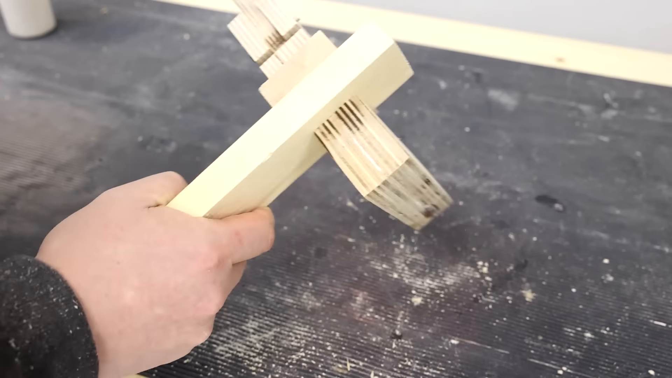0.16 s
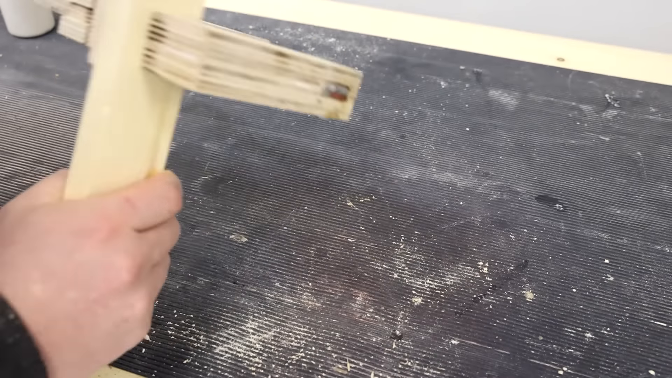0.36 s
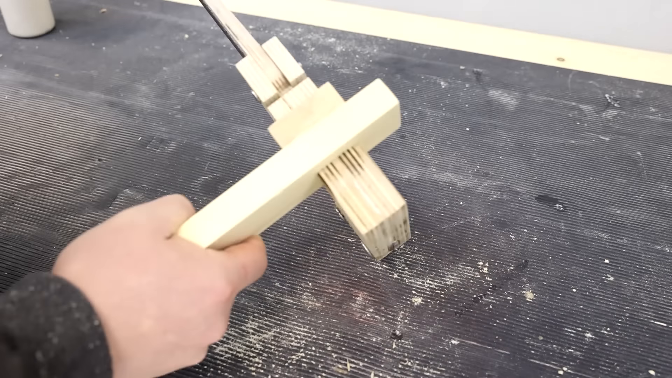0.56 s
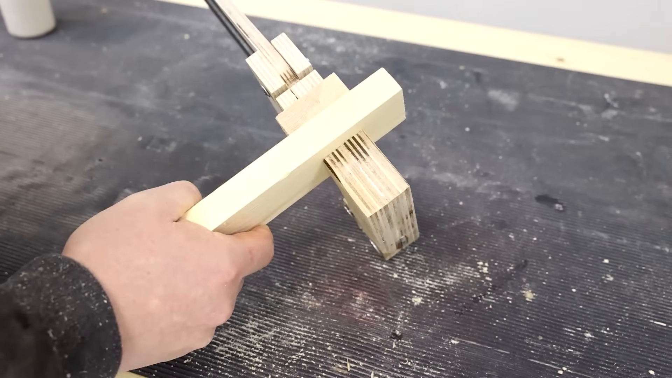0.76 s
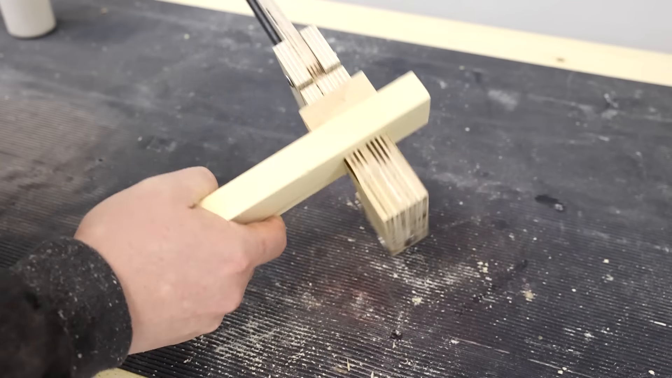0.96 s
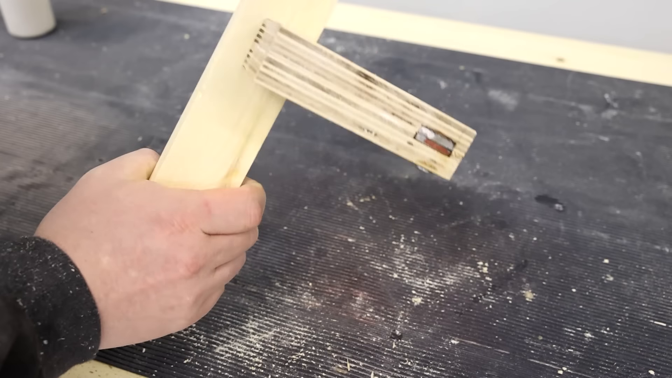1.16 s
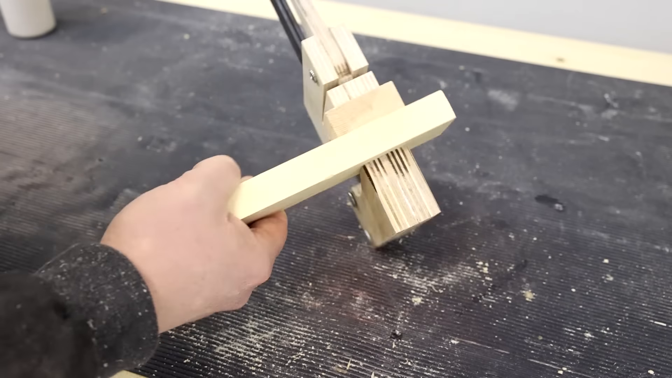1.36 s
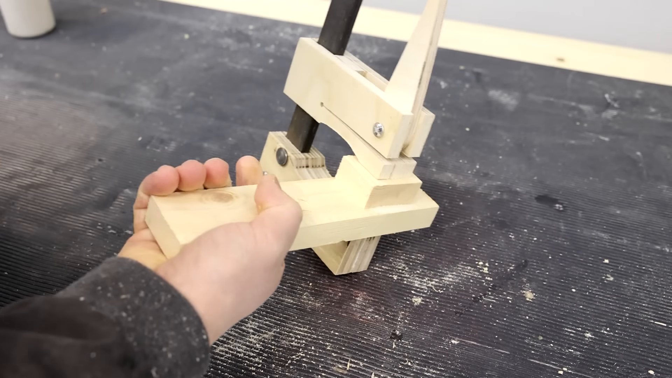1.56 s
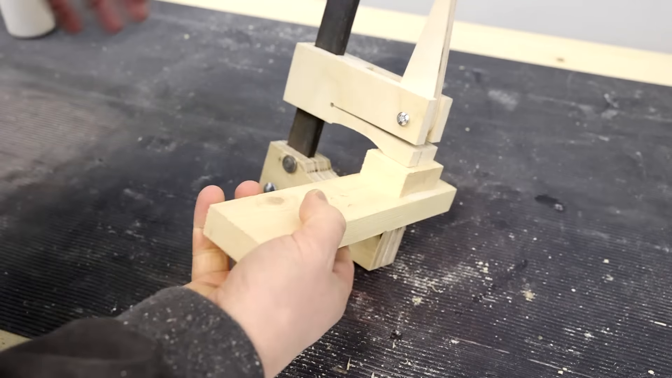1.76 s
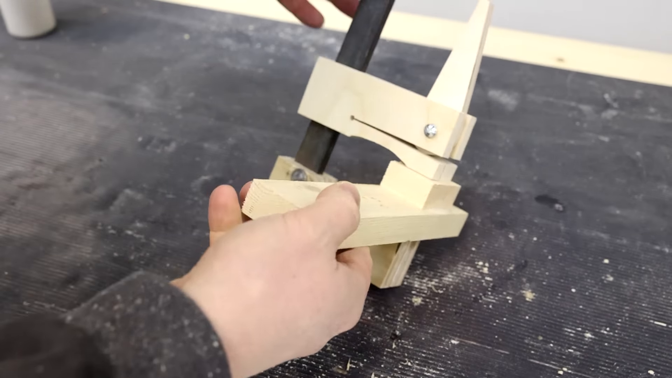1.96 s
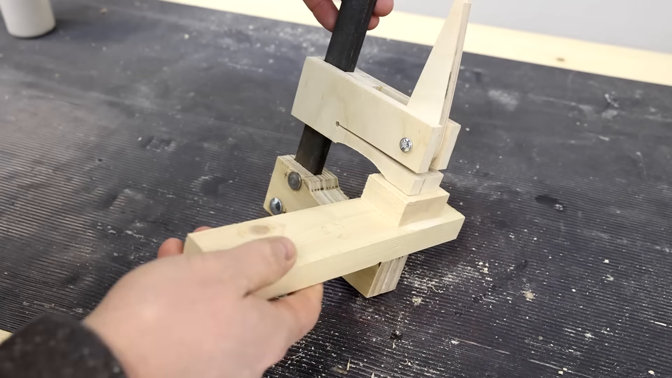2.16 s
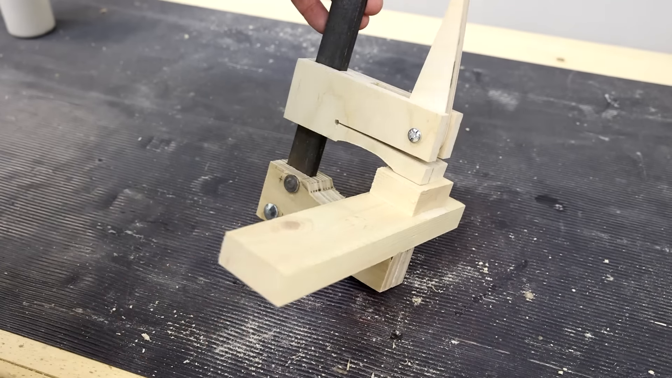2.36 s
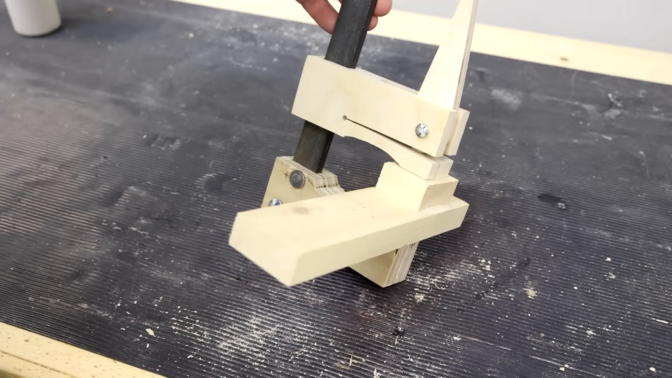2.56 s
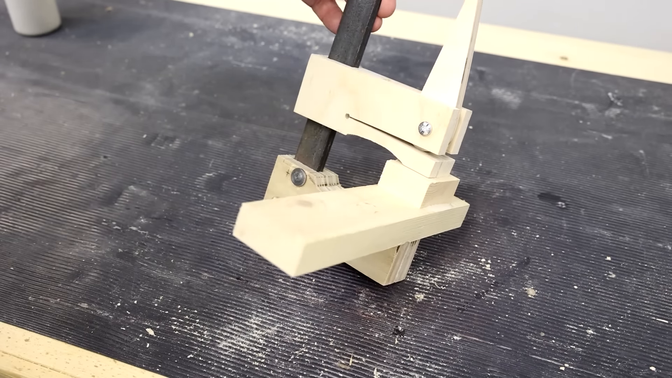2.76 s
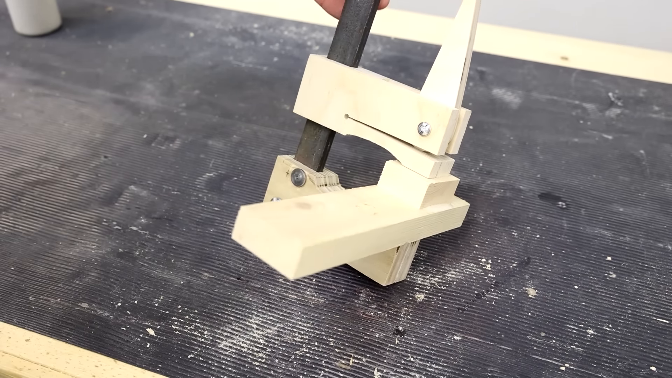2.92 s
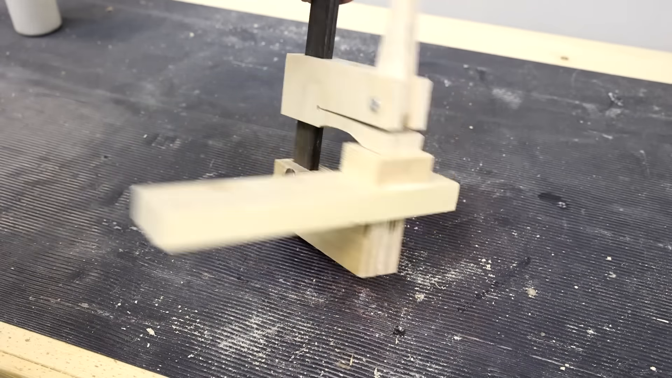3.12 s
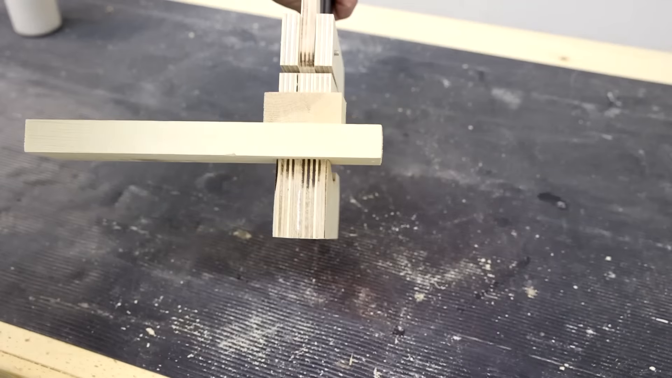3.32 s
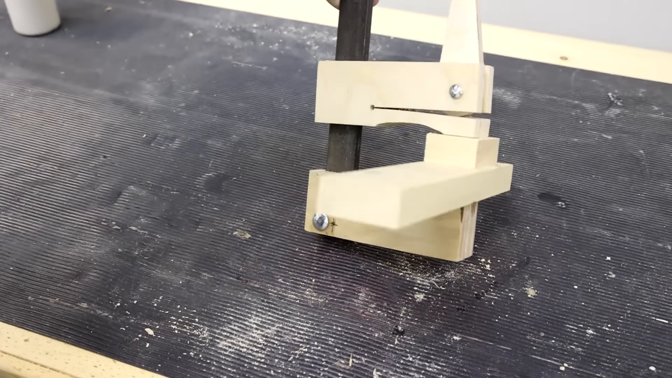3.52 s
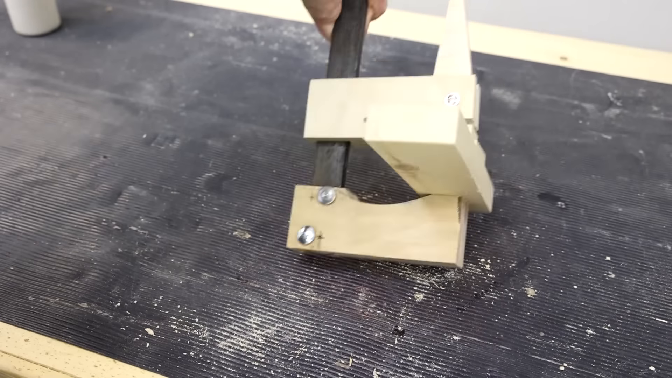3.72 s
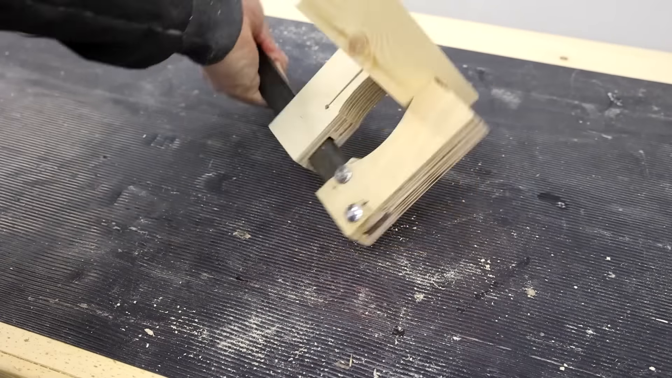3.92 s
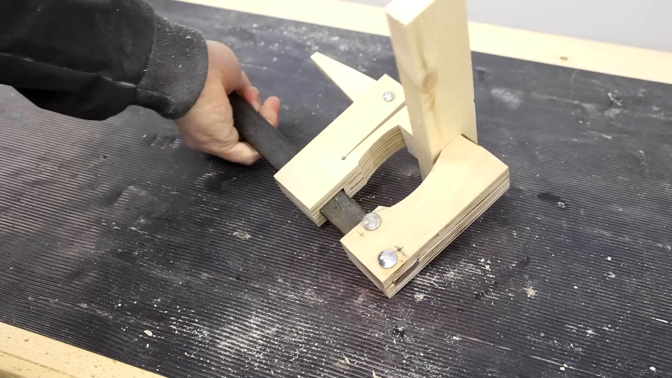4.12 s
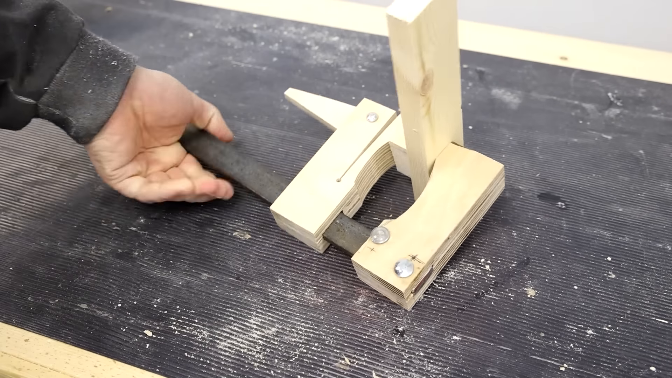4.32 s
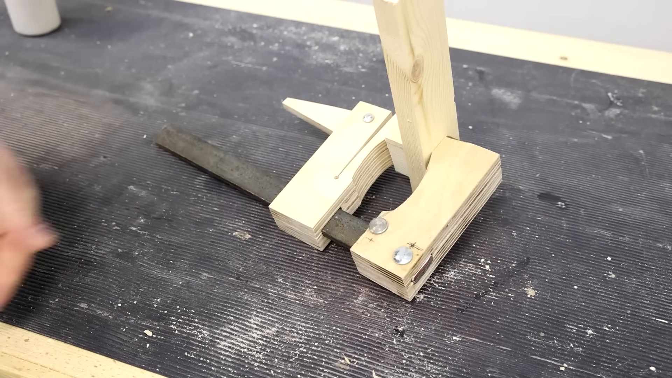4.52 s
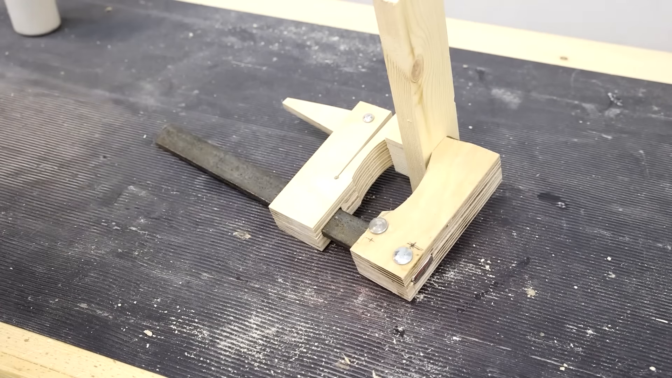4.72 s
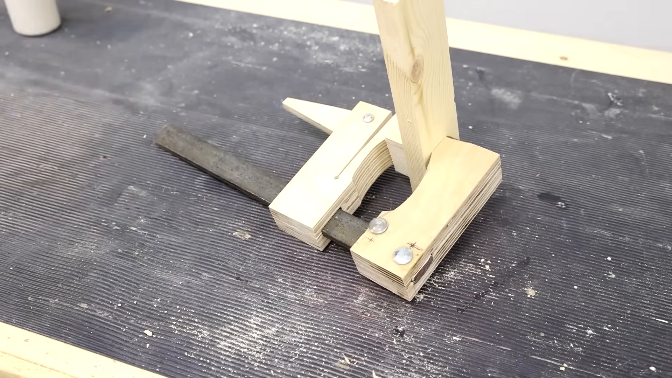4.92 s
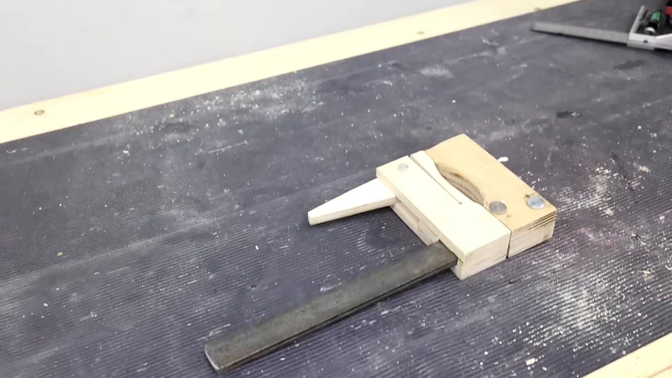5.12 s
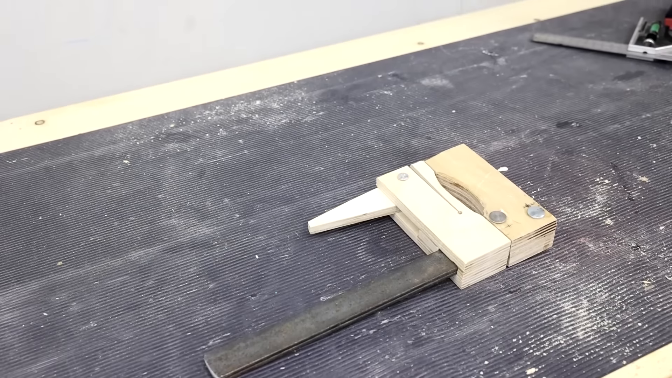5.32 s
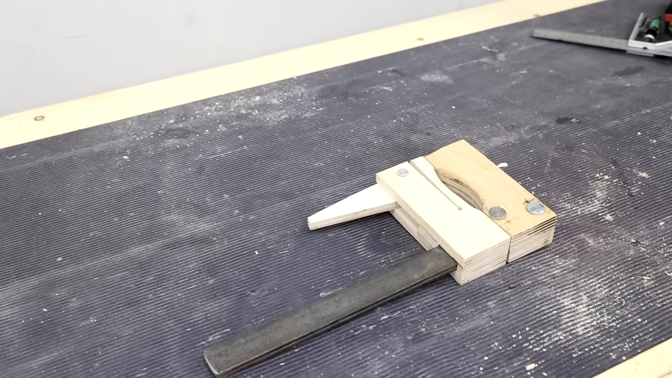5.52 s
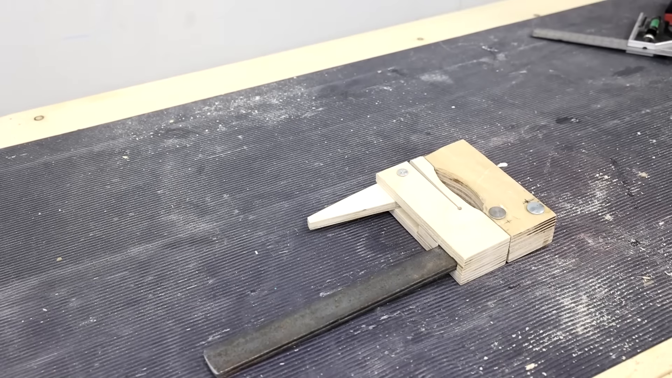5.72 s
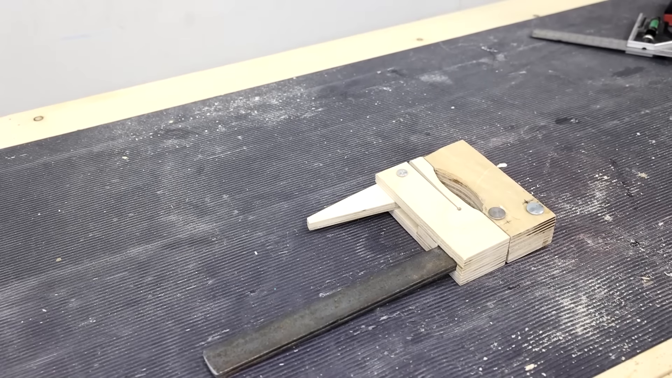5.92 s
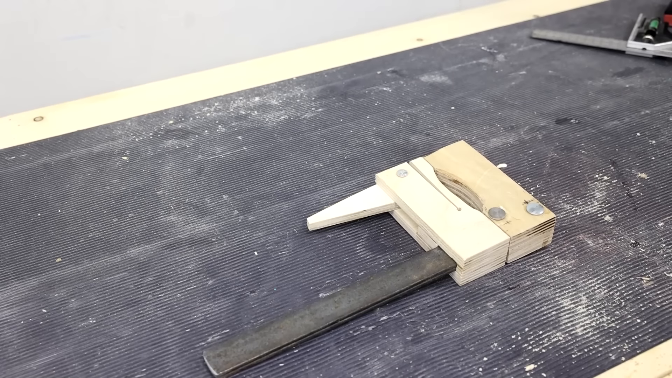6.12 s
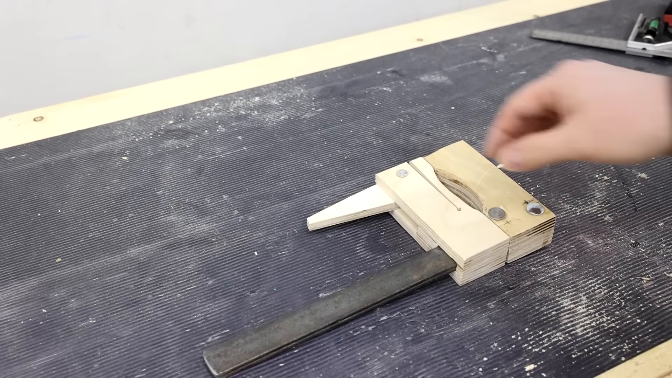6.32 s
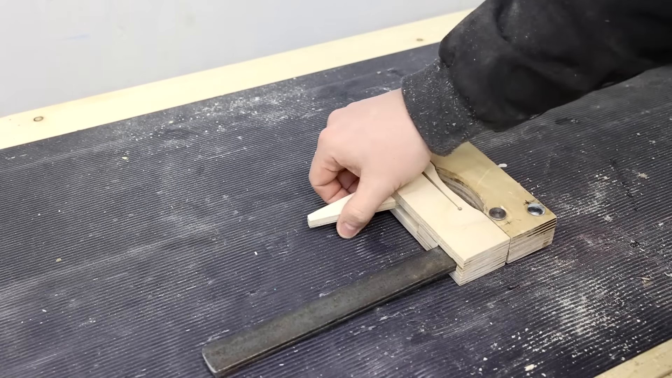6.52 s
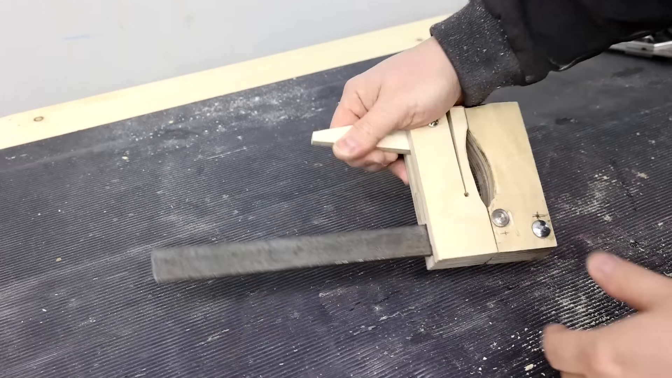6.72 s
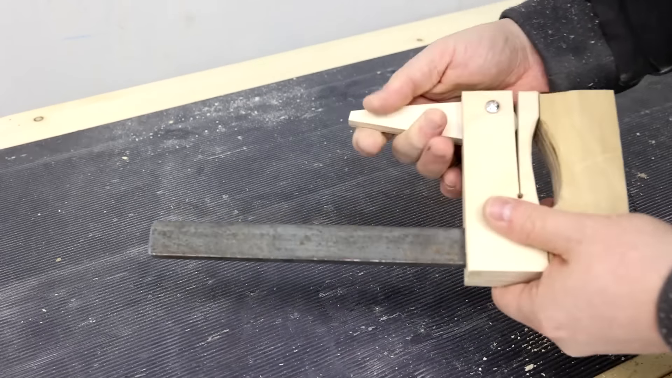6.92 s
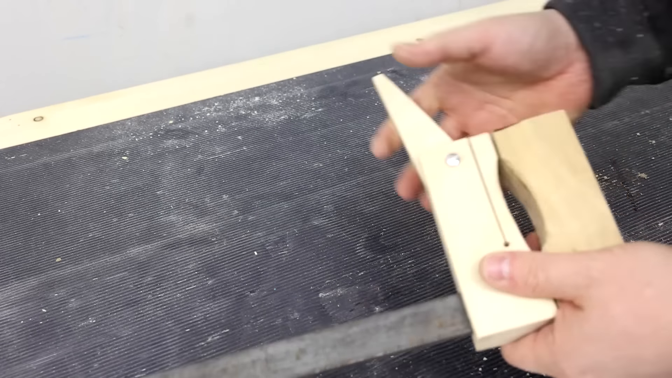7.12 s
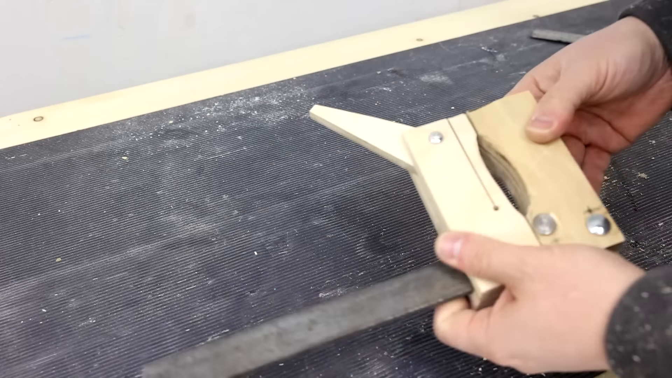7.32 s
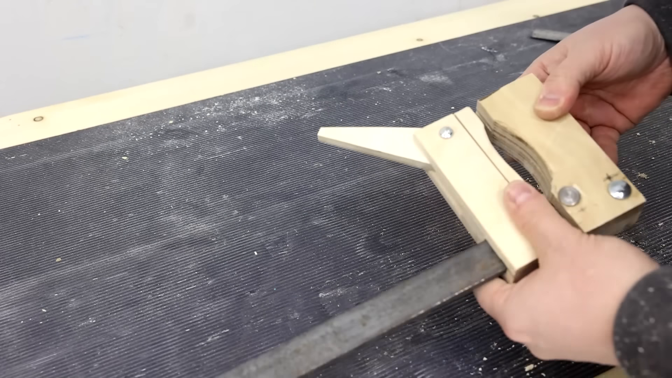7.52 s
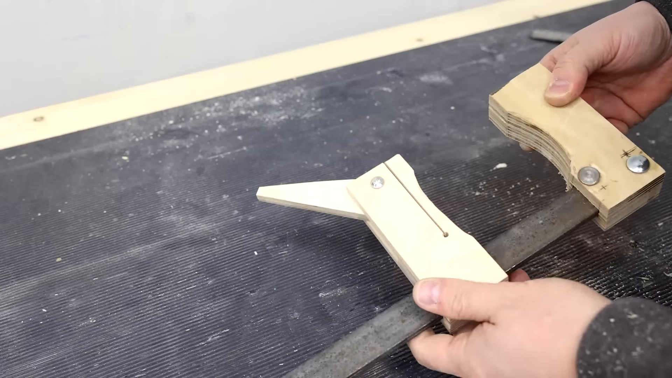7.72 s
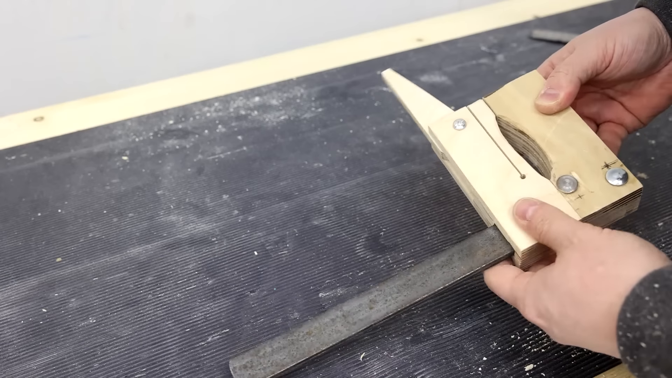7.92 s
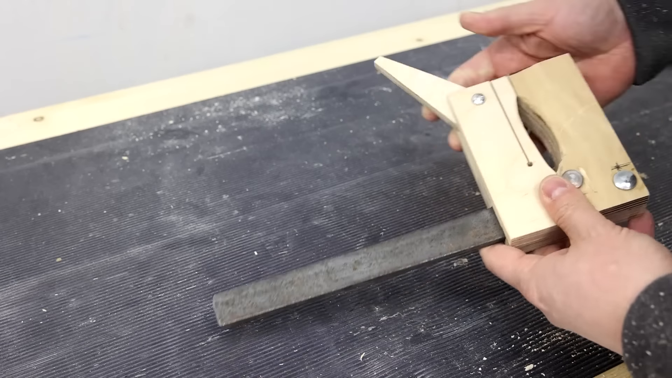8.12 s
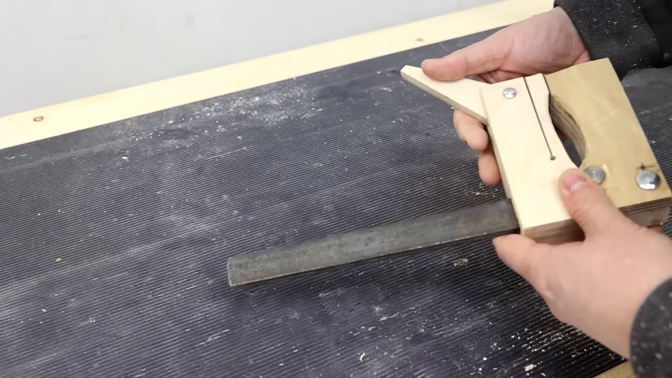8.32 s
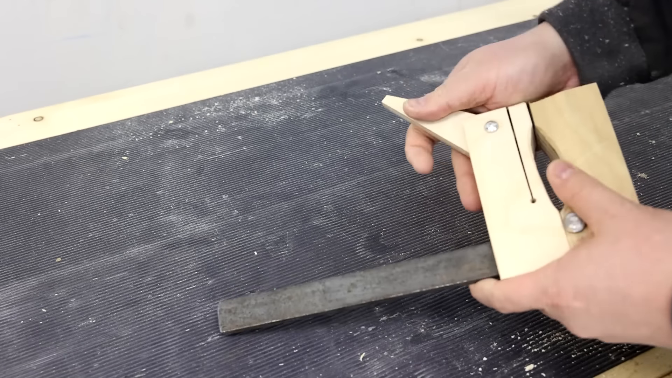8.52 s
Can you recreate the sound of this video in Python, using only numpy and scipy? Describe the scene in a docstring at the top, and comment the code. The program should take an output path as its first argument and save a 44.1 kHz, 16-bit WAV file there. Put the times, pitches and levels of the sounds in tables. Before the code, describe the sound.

A wooden bar clamp is turned in the hands and set down on a rubber-matted workbench, giving scattered wooden knocks and light clicks over a faint rustle of skin and sleeves. After a quieter stretch, its jaw slides along the steel bar in three short scrapes, ending in a burst of loud, bright metallic clacks. The sounds are close and ring briefly in a small workshop.

```python
"""Wooden knocks, steel clacks and short scrapes over a soft rustle, ringing briefly in a small workshop.
A wooden bar clamp is turned in the hands, set down on a rubber-matted bench and its jaw slid along the
steel bar. Each knock is a crack plus the modes of bench, wooden jaws and bar in its own mix.
Skin, sleeves and rubbed wood are shaped noise; the sliding jaw is a dense run of tiny catches."""
import sys
import numpy as np
from scipy import signal
from scipy.fft import rfft, irfft
from scipy.io import wavfile

SR = 44100
rng = np.random.default_rng(int(sys.argv[2]) if len(sys.argv) > 2 else 0)


def store_wav(level_fs):
    """Save 16-bit WAV to argv[1]."""
    pcm = np.round(np.clip(np.atleast_2d(level_fs), -1, 1) * 32767)
    wavfile.write(sys.argv[1], SR, pcm.T.astype(np.int16))


N = 381906

# steel bar modes: (frequency [Hz], level [dB], t60 [s])
BAR_MIDDLE_MODES = [(1570, 1.5, .008), (1850, -7, 0.0067), (2200, -5, 0.01), (2580, -13, .008),
                    (3172, 1.5, 0.0092), (3600, -1.5, 0.0072), (4050, -1, 0.0064)]
BAR_TREBLE_MODES = [(4630, -10, .008), (4880, -8, .014), (5770, -12.5, .01), (6030, -1.5, 0.011),
                    (6230, -3.5, 0.022), (6360, -1, 0.028), (6340, -25, .3), (6484, -5.5, .025),
                    (6690, -5, 0.0047), (7550, -16.5, .006)]
# wood meets bench: (time [s], crack [dB], crack centre [Hz], bar [dB], jaws [dB],
# jaws tilt [dB/octave], bench [dB], bench tilt [dB/octave])
SET_DOWNS = [(0.971, -50, 1300, -65, -75.5, -6, -59, -9.5), (1.4257, -8.5, 1600, -22, -36, 4, -33.5, 0.5),
             (1.4521, -12, 1750, -34, -58, 10, -48, 7), (1.4652, -15, 1606, -31.5, -41, -2, -43.5, 4),
             (1.6279, -9.5, 1437, -28.5, -22, 8, -27, 3), (1.7964, -22.5, 4300, -56, -60, -6, -50.5, -4),
             (1.849, -25.5, 2260, -63, -78, -3, -62, -18.5), (2.0333, -27, 4740, -59, -52, 2, -64.5, -18),
             (2.6042, -7, 1820, -18.5, -31, 5.5, -37, -6), (3.499, -16, 1950, -35.5, -45, 5, -49, -6.5),
             (3.5794, -36, 3020, -74, -61, -4, -53, -11),
             (3.8337, -15.5, 4720, -30.5, -43.5, 5.5, -49, -9.5),
             (4.109, -11.5, 5570, -30.5, -34, -13.5, -30, 5),
             (4.2497, -28, 1440, -29.5, -22.5, 2.5, -36.5, 10.5),
             (4.4232, -38.5, 2260, -58, -54, -9, -46, 4), (4.45, -14.5, 1320, -38, -19, 7, -37.5, 15),
             (5.1406, -44, 1400, -71, -60, 4, -67, -7), (5.2784, -48, 2050, -72, -62, 20, -65.5, 2),
             (5.379, -36, 1570, -78, -63, 1.8, -68, 7), (5.5174, -47, 2440, -66, -60, 9, -69.5, -17),
             (5.779, -19, 2090, -59, -48, 15.5, -61, 10), (6.536, -24, 2500, -49, -41, 6, -55, -3),
             (6.569, -23, 1590, -56, -39.5, 3.5, -58, 1), (6.683, -19, 2200, -38, -39, 17, -47, -1.5),
             (6.7053, -38, 1380, -58, -52, -12, -45.5, 3)]
BAND_EDGES_HZ = 30 * 2 ** np.arange(0, 9.3, .5)


def from_db(db):
    """Decibels to gain."""
    return 10 ** (np.asarray(db) / 20)


def unit_rms(x):
    """Scale to unit power."""
    return x / np.sqrt(np.mean(x ** 2) + 1e-20)


def in_time(rows):
    """Interpolate each column after the time column, per sample."""
    times_s, *columns = np.transpose(rows)
    return [np.interp(np.arange(N) / SR, times_s, column) for column in columns]


def at_hz(points, hz):
    """Interpolate over log frequency."""
    points_hz, values = np.transpose(points)
    return np.interp(np.log(hz), np.log(points_hz), values)


def band(x, low_hz, high_hz):
    """Gentle band-pass."""
    sos = signal.butter(2, [low_hz, min(high_hz, 18000)], "band", fs=SR, output="sos")
    return signal.sosfilt(sos, x)


def drift(rate_hz):
    """Slow random wander, unit RMS."""
    hop = 40
    pole = np.exp(-2 * np.pi * rate_hz * hop / SR)
    slow = signal.lfilter([1], [1, -2 * pole, pole ** 2], rng.standard_normal(N // hop + 2002))[2000:]
    return np.interp(np.arange(N) / hop, np.arange(len(slow)), unit_rms(slow))


def ring(push, modes, tilt_db_per_oct=0, t60_scale=1):
    """A push rings every mode, every third inverted; where it lands tilts low against high modes."""
    out, middle_hz = 0, modes[len(modes) // 2][0]
    for k, (hz, level_db, t60_s) in enumerate(modes):
        r, w = 10 ** (-3 / (t60_scale * t60_s * SR)), 2 * np.pi * hz / SR
        gain = (-1) ** (k % 3 == 2) * from_db(level_db + tilt_db_per_oct * np.log2(hz / middle_hz))
        out = out + gain * signal.lfilter([0, np.sin(w)], [1, -2 * r * np.cos(w), r * r], push)
    return out


def stereo_bands(size):
    """Half-octave bands of stereo noise, alike in the bass, unlike in the treble."""
    # (frequency [Hz], left-right correlation [-1..1])
    correlation = [(60, 1), (150, 0.74), (380, 0.917), (950, 0.77), (2380, 0.36), (5960, -0.13),
                   (15000, 0.12)]
    white = rng.standard_normal((2, 2, size))
    for k, (low_hz, high_hz) in enumerate(zip(BAND_EDGES_HZ, BAND_EDGES_HZ[1:])):
        mid, side = band(white[k % 2], low_hz, high_hz)
        hz = np.sqrt(low_hz * high_hz)
        alike = at_hz(correlation, hz)
        yield hz, np.sqrt(1 + alike) * mid + np.sqrt(1 - alike) * side * [[1], [-1]]


def workshop_echo(x):
    """Echoes thicken within a few ms into a noise tail that dies band by band."""
    # room decay: (frequency [Hz], t60 [s])
    decay = [(100, 0.15), (400, 0.338), (1500, 0.35), (4000, 0.36), (8000, 0.32), (15000, 0.28)]
    # echo against direct sound: (frequency [Hz], level [dB])
    echo_levels = [(100, -20), (400, -2), (1500, -5.5), (4000, -7), (8000, -9.5), (15000, -4)]
    t = np.arange(SR // 2) / SR
    tail = 0
    for hz, noise in stereo_bands(len(t)):
        t60_s = at_hz(decay, hz)
        decay_energy = t60_s * SR / np.log(1e6)
        tail = tail + noise * from_db(at_hz(echo_levels, hz) - 60 * t / t60_s) / np.sqrt(decay_energy)
    build_up = 1 - np.exp(-(t / 0.00088) ** 2)
    return signal.fftconvolve(x[None], tail * build_up, axes=1)[:, :N]


def rubbing_gains():
    """Shuffle, skin and cloth gains: slow handling, quick brushes, the clamp settling on the mat."""
    # hands and sleeves: (time [s], low shuffle [dB], skin on wood [dB], cloth hiss [dB])
    handling = [(0.0, -75, -65.5, -66), (0.51, -78.5, -72.5, -74), (0.84, -70, -69, -76),
                (1.11, -80, -78, -76), (1.47, -73.5, -64, -66.5), (1.61, -70, -66, -66.5),
                (2.1, -68.5, -61.5, -66), (2.6, -72, -64, -67), (2.94, -79, -60.5, -56),
                (3.33, -80.5, -73, -71), (3.76, -68.5, -64.5, -74.5), (4.15, -79.5, -70.5, -66),
                (4.29, -48, -58, -65), (4.36, -58.5, -65.5, -64.5), (4.75, -73, -61, -61.5),
                (5.38, -77.5, -73, -78.5), (5.84, -73, -66.5, -69.5), (6.49, -75.5, -66, -62.5),
                (6.73, -62, -56.5, -56), (7.04, -75, -64, -60), (7.96, -79.5, -73.5, -71.5),
                (8.08, -82.5, -62, -65.5), (8.3, -74, -68, -70), (8.66, -75, -73, -72)]
    # (peak time [s], half-width [s], skin [dB], cloth [dB])
    brushes = [(.03, 0.05, -73.5, -73.5), (.32, 0.031, -73, -69), (.5, 0.026, -73, -71),
               (1.14, 0.037, -69, -68), (2.018, 0.0272, -58.5, -55), (2.332, 0.029, -58.5, -69),
               (2.5, 0.073, -59, -60.5), (3.016, 0.038, -54.5, -51), (5.044, 0.037, -67, -55.5),
               (5.619, 0.06, -63.5, -64.5), (5.797, 0.04, -61, -62), (6.104, 0.033, -60, -54),
               (6.44, 0.027, -62, -71), (7.073, 0.02, -81, -51), (8.489, 0.017, -83.5, -64),
               (8.629, 0.1, -72.5, -64.5)]
    settle_re_bench_db, skin_re_settle_db, settle_t60_s = -11, -7.5, 0.255
    t = np.arange(N) / SR
    shuffle_power, skin_power, cloth_power = from_db(in_time(handling)) ** 2
    blows = np.zeros(N)
    for time_s, *_, bench_db, _ in SET_DOWNS:
        blows[round(time_s * SR)] = from_db(bench_db + settle_re_bench_db) ** 2
    settle_power = signal.lfilter([1], [1, -from_db(-60 / (settle_t60_s * SR)) ** 2], blows)
    shuffle_power += settle_power
    skin_power += settle_power * from_db(skin_re_settle_db) ** 2
    for peak_s, width_s, skin_db, cloth_db in brushes:
        swell = np.exp(-((t - peak_s) / width_s) ** 2)
        skin_power += swell * from_db(skin_db) ** 2
        cloth_power += swell * from_db(cloth_db) ** 2
    return np.sqrt([shuffle_power, skin_power, cloth_power])


def rustle_and_air(flicker_db, air_db):
    """Three rubbing noises swell and flicker, band by band, over steady workshop air."""
    # noise spectra: (frequency [Hz], relative density [dB])
    shuffle = [(60, -12), (120, -13), (250, 0), (450, 2), (800, -4.5), (1500, -60.5)]
    skin = [(300, -32.5), (600, -6.5), (1000, 0), (1700, -0.5), (2800, -1.5), (4500, -7.5), (8000, -34.5)]
    cloth = [(1500, -31), (3000, -2), (4500, -0.5), (7000, 0.5), (10000, -5.5), (13000, -8), (16000, -10)]
    air = [(15, -44), (25, -25.5), (49, -2), (273, 3.5), (348, -3.5), (398, 8), (535, -12.5), (1650, -11.5),
           (2540, -17.5), (3330, 2.5), (15400, -20)]
    gains = rubbing_gains()
    centres_hz, widths_hz = np.sqrt(BAND_EDGES_HZ[1:] * BAND_EDGES_HZ[:-1]), np.diff(BAND_EDGES_HZ)
    shapes = [from_db(at_hz(spectrum, centres_hz)) for spectrum in (shuffle, skin, cloth, air)]
    *rub_shapes, air_shape = [s / np.sqrt(np.sum(s ** 2 * widths_hz) * 2 / SR) for s in shapes]
    out, common_drift = 0, drift(rate_hz=18)
    for k, (_, noise) in enumerate(stereo_bands(N)):
        rub_power = sum((gain * shape[k]) ** 2 for gain, shape in zip(gains, rub_shapes))
        air_power = (from_db(air_db) * air_shape[k]) ** 2
        flicker = from_db(flicker_db * (common_drift + .5 * drift(rate_hz=10)))
        out = out + noise * np.sqrt(rub_power * flicker ** 2 + air_power)
    return out


def squeaks():
    """Rubbed wood whistles and rasps: noise through one resonance, faded in and out."""
    # (start [s], end [s], centre [Hz], width [Hz], level [dB])
    rubs = [(0.51, 0.94, 1570, 220, -74), (1.79, 2.16, 4400, 380, -66.5), (1.788, 1.9, 3420, 300, -68),
            (2.3, 2.4, 1600, 127, -76), (3.554, 3.852, 8100, 94, -95), (2.569, 2.61, 4000, 1500, -41.5),
            (2.598, 2.677, 4900, 4500, -50), (2.74, 3.0, 8980, 2150, -64), (0.8, 0.89, 477, 500, -77),
            (5.57, 5.68, 1800, 1200, -61.5)]
    t, out = np.arange(N) / SR, np.zeros(N)
    for start_s, end_s, hz, width_hz, level_db in rubs:
        on = (t > start_s) & (t < end_s)
        tone = unit_rms(band(rng.standard_normal(on.sum()), hz - width_hz / 2, hz + width_hz / 2))
        fade = np.sqrt(np.sin(np.pi * (t[on] - start_s) / (end_s - start_s)))
        out[on] += from_db(level_db) * tone * fade
    return out


def jaw_slides():
    """The jaw scrapes along the bar: dense uneven catches of wood rasp and ring the steel."""
    # one curve per stroke: (time [s], level [dB])
    strokes = [
        [(7.429, -30), (7.444, -32.5), (7.455, -53), (7.53, -63)],
        [(7.63, -70.5), (7.648, -43.5), (7.69, -44), (7.71, -58.5), (7.76, -80)],
        [(7.893, -61), (7.92, -44), (7.938, -40), (7.95, -40), (7.98, -31.5)],
    ]
    catches_per_s, uneven_db = 4000, 3.0
    catches = (rng.random(N) < catches_per_s / SR) * rng.standard_normal(N)
    catches = catches * from_db(uneven_db * drift(rate_hz=120)) + 1e-18
    bar = from_db(12.5) * ring(catches, BAR_TREBLE_MODES) + ring(catches, BAR_MIDDLE_MODES)
    rasp = from_db(12.0) * unit_rms(band(catches, 1300, 6000))
    scrape = unit_rms(band(unit_rms(bar), 590, 13000) + rasp)
    t = np.arange(N) / SR
    envelope = sum(from_db(in_time(rows)[0]) * (t > rows[0][0]) * (t < rows[-1][0]) for rows in strokes)
    return scrape * envelope


def place(sound, time_s):
    """Pan a knock to the clamp's position; the farther ear hears it later."""
    # (time [s], left lag [us], left minus right [dB])
    positions = [(0, -66, 5), (1.4, 33, -2.7), (2.5, -36, 4), (4, -18, -1.3), (4.5, -26, 2), (5.5, 62, 0.5),
                 (6.6, 12, 0.5), (7.5, 45, -2.04), (8, 23, 2.5)]
    times_s, lags_us, pans_db = np.transpose(positions)
    lag_s = np.interp(time_s, times_s, lags_us) * 1e-6
    delays_s = np.array([[max(lag_s, 0)], [max(-lag_s, 0)]])
    hz = np.fft.rfftfreq(len(sound), 1 / SR)
    pair = irfft(rfft(sound) * np.exp(-2j * np.pi * hz * delays_s), len(sound))
    return pair * from_db(np.interp(time_s, times_s, pans_db) * np.array([[.5], [-.5]]))


def strike(out, time_s, crack_db, crack_hz, treble_db, middle_db, jaws_db, jaws_db_per_oct,
           bench_db, bench_db_per_oct, contact_ms, sheen_re_crack_db):
    """Add one contact to out: a crack, a rough push on the bar, a clean push on jaws and bench."""
    size, gripped_until_s = 12288, 7.3
    t_ms = 1000 * np.arange(size) / SR
    tick = (t_ms == 0) + 1e-18
    grit = rng.standard_normal(size) * np.exp(-t_ms / contact_ms) * np.tanh(t_ms / (.3 * contact_ms))
    grit = grit / np.sqrt(np.sum(grit ** 2)) + 1e-18
    edge = band(.9 * tick + grit, crack_hz / 1.3, crack_hz * 1.4)
    sheen = from_db(sheen_re_crack_db) * band(grit, 7700, 16000)
    crack = from_db(crack_db) * (band(edge, crack_hz / 1.33, crack_hz * 1.65) + sheen)
    t60_scale = .22 if time_s < gripped_until_s else 1   # tight jaws and the mat damp the bar
    treble = from_db(treble_db) * ring(grit, BAR_TREBLE_MODES, t60_scale=t60_scale)
    middle = from_db(middle_db) * ring(grit, BAR_MIDDLE_MODES, t60_scale=t60_scale)
    bar = band(treble + middle, 1900, 9300)
    # (frequency [Hz], level [dB], t60 [s])
    jaw_modes = [(487, -14, 0.1), (535.5, -2.5, 0.028), (618.7, 0, 0.055), (715, -2, 0.016),
                 (800, -4, 0.022), (932, -4.5, 0.038), (1148, -5.5, 0.0088), (1300, -16, 0.026),
                 (1616, -13.5, 0.014), (1915, -17.5, 0.0065)]
    bench_modes = [(129.8, -11.5, 0.29), (166, -10, 0.17), (221.5, -4.5, 0.19), (260, -1, 0.19),
                   (277, -7, 0.13), (341, -6.5, 0.11), (410, -8, 0.19)]
    jaws = from_db(jaws_db) * band(ring(tick, jaw_modes, jaws_db_per_oct), 300, 3900)
    bench = band(ring(tick, bench_modes, bench_db_per_oct), 118, 700)
    bench = from_db(bench_db) * band(bench, 100, 1500)
    start = round(time_s * SR)
    out[:, start:start + size] += place(crack + bar + jaws + bench, time_s)[:, :N - start]


def set_downs():
    """The clamp lands on the mat; rubber excites the bar's high modes less than its middle ones."""
    out = np.zeros((2, N))
    for time_s, crack_db, crack_hz, bar_db, *jaws_and_bench in SET_DOWNS:
        treble_db = bar_db - 5.5
        strike(out, time_s, crack_db, crack_hz, treble_db, bar_db, *jaws_and_bench,
               contact_ms=4.58, sheen_re_crack_db=-9.5)
    return out


def jaw_clacks():
    """The jaw hits the steel bar: short contact, bright jaws, faint answer from the bench."""
    # (time [s], crack [dB], crack centre [Hz], bar treble [dB], bar middle [dB], jaws [dB])
    clacks = [(0.2275, -22.5, 3200, -51, -59, -74), (0.426, -34, 3960, -71, -76, -84.5),
              (0.9068, -43, 3160, -53, -41.5, -67), (1.1651, -31, 3220, -66, -35.5, -80),
              (1.5873, -36, 3230, -65, -49, -70), (2.5728, -2, 3250, -31, -24, -38.5),
              (3.768, -31, 3270, -62, -40, -76), (3.81, -30, 3800, -66, -60, -78),
              (4.01, -30, 3600, -66, -60, -80), (5.5938, -20.5, 1960, -61, -57, -77),
              (6.9682, -24.5, 7500, -30, -63, -76), (7.4295, -20, 6240, -45, -49.5, -42),
              (7.436, -24, 5000, -33, -53, -64), (7.4424, -21, 4940, -21.5, -32, -81),
              (7.5036, -6, 5000, -39, -28.5, -50), (7.5487, -19.5, 1820, -60, -61, -71.5),
              (7.5682, -7.5, 1860, -41, -44, -57.5), (7.649, -13.5, 6240, -37, -41.5, -53),
              (7.667, -37.5, 4740, -31, -36, -44.5), (7.6729, -28, 4970, -48, -40.5, -73),
              (7.6897, -8, 5030, -51.5, -56, -76.5), (7.8923, -23, 2660, -46, -33, -51),
              (7.9074, -19, 3260, -40.5, -37.5, -77.5), (7.9423, -0.9, 6218, -12.5, -15, -46),
              (7.9604, 13, 6020, -13.5, -13.5, -68), (7.9816, 15.5, 6340, 3.5, -5.5, -57.5),
              (7.9884, 14.5, 6140, -21, -33.5, -73), (8.5094, -30, 3260, -52.5, -71, -66)]
    out = np.zeros((2, N))
    for time_s, crack_db, crack_hz, treble_db, middle_db, jaws_db in clacks:
        strike(out, time_s, crack_db, crack_hz, treble_db, middle_db, jaws_db, jaws_db_per_oct=16,
               bench_db=crack_db - 73.5, bench_db_per_oct=16, contact_ms=2.14, sheen_re_crack_db=-10)
    return out


def scene():
    """Knocks, slides and squeaks with their echo, over the rustle."""
    direct = set_downs() + jaw_clacks() + jaw_slides() + squeaks()
    return direct + workshop_echo(direct.mean(axis=0)) + rustle_and_air(flicker_db=1.65, air_db=-80)


def record(dry):
    """Soft-limit the peaks, thin the bass, cut the top."""
    limited = 1.321 * np.tanh(dry / 1.497)
    thinned = signal.sosfilt(signal.butter(2, 75, "high", fs=SR, output="sos"), limited)
    return signal.sosfilt(signal.cheby2(12, 60, 16000, fs=SR, output="sos"), thinned).clip(-1, 1)


dry = scene()
out = record(dry)
store_wav(out)
```